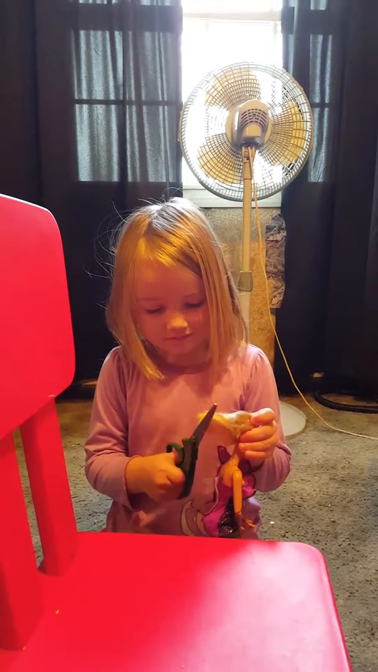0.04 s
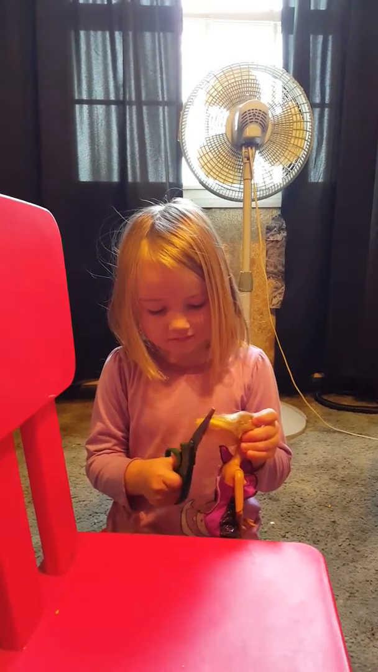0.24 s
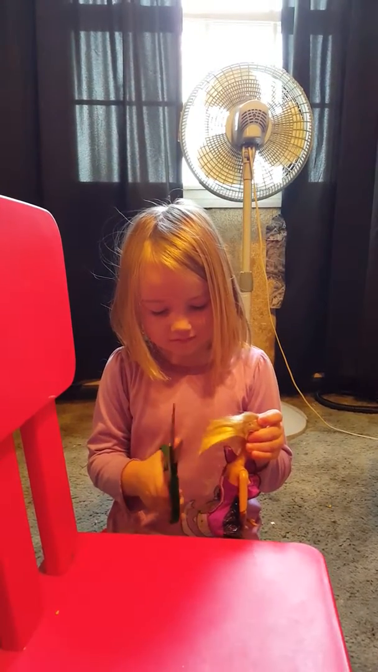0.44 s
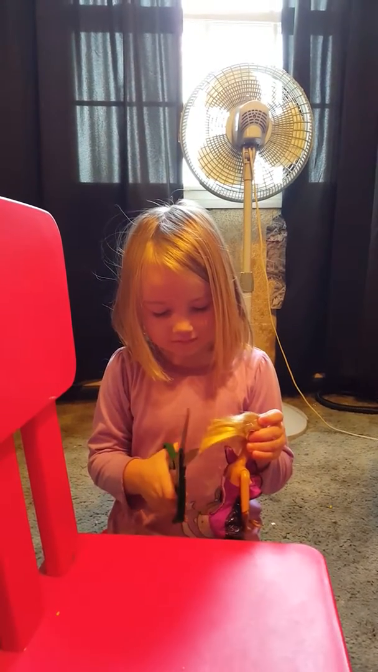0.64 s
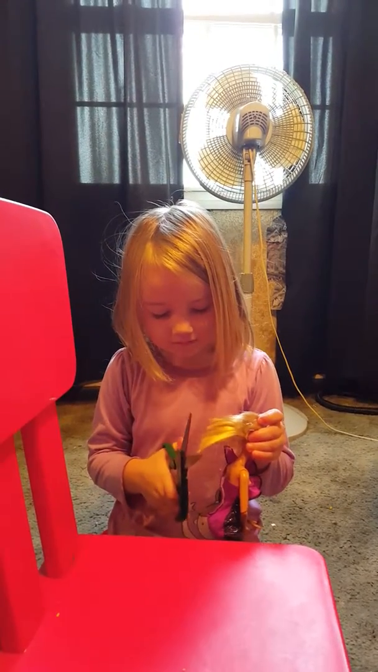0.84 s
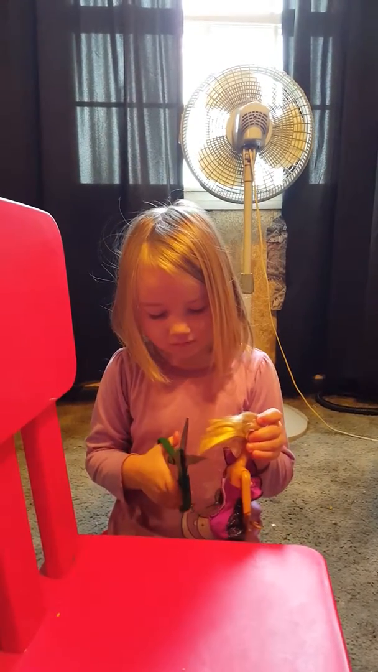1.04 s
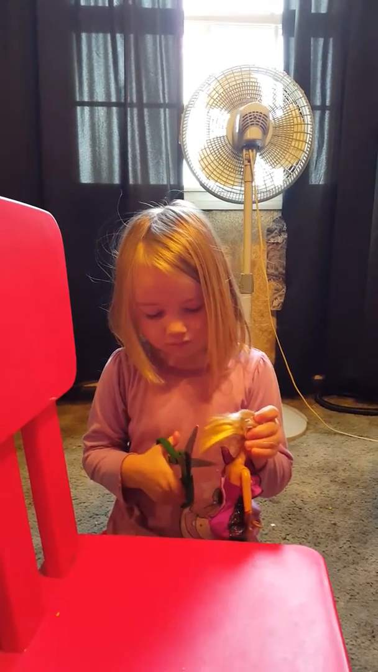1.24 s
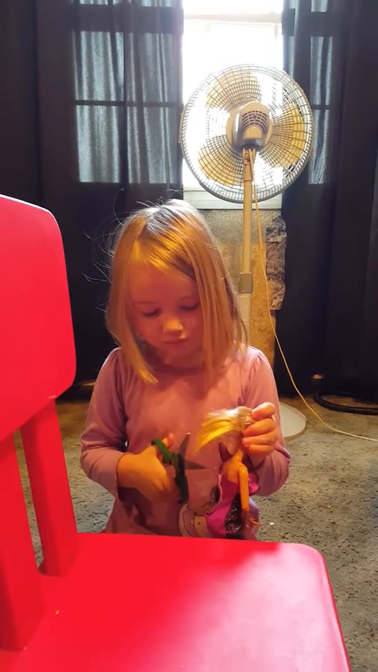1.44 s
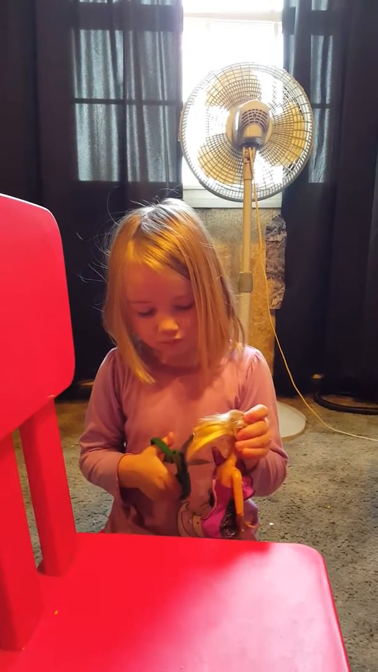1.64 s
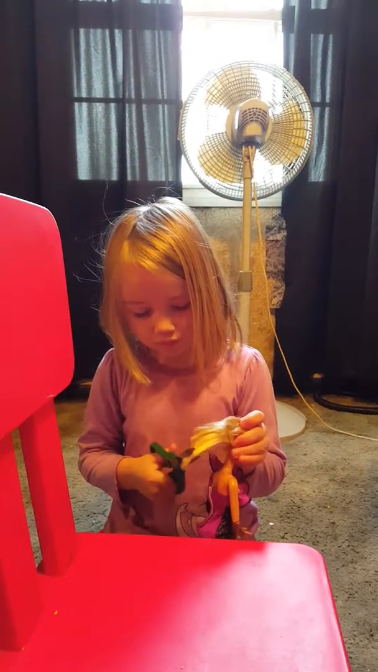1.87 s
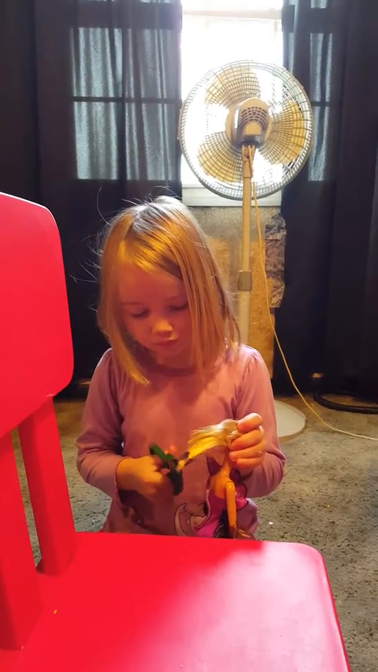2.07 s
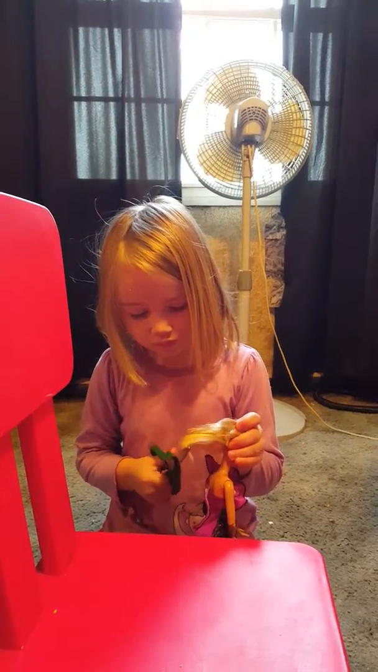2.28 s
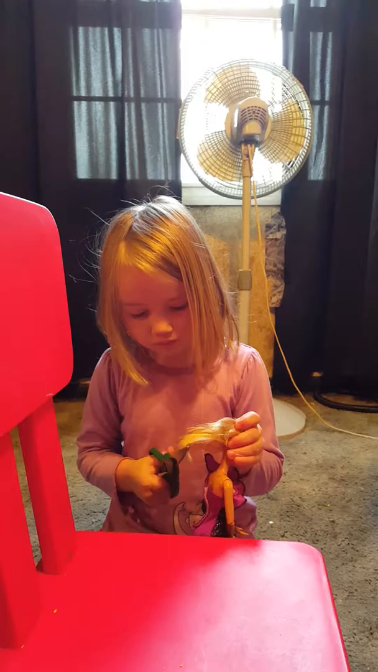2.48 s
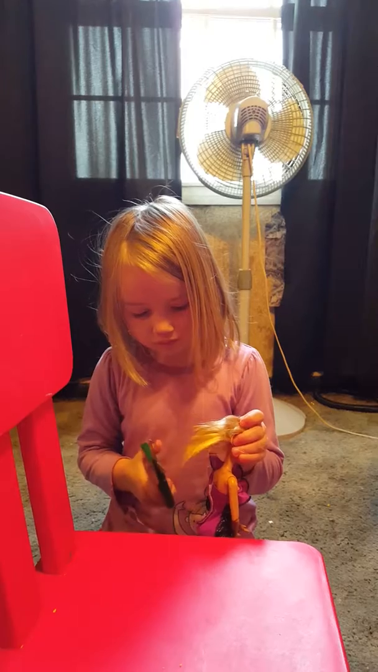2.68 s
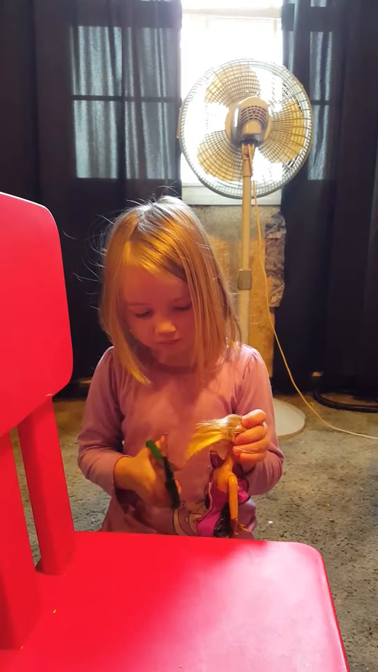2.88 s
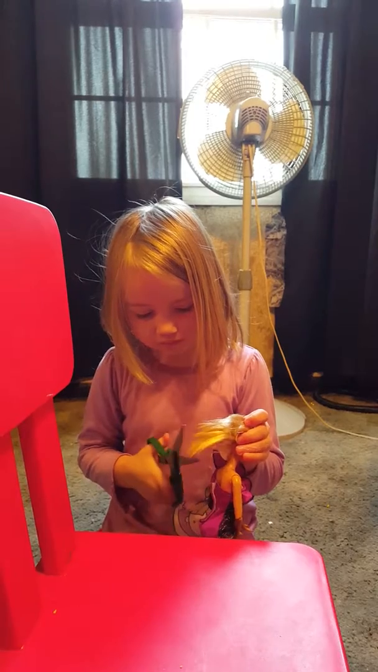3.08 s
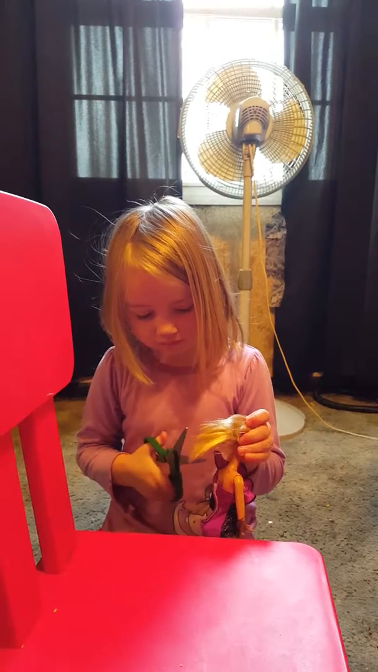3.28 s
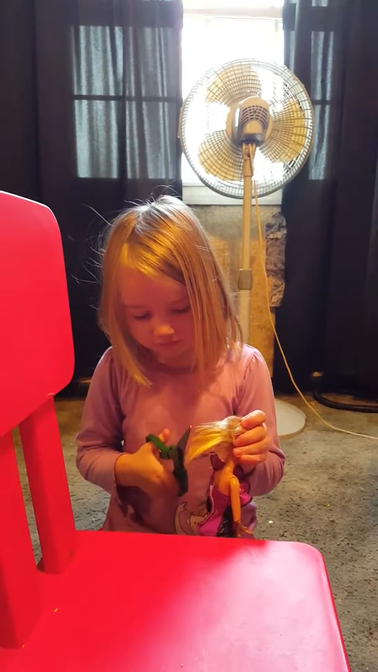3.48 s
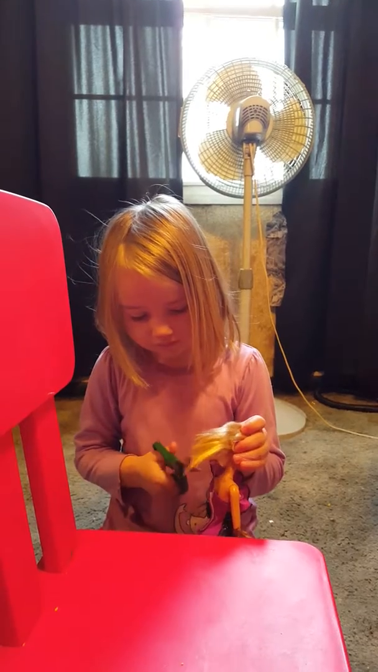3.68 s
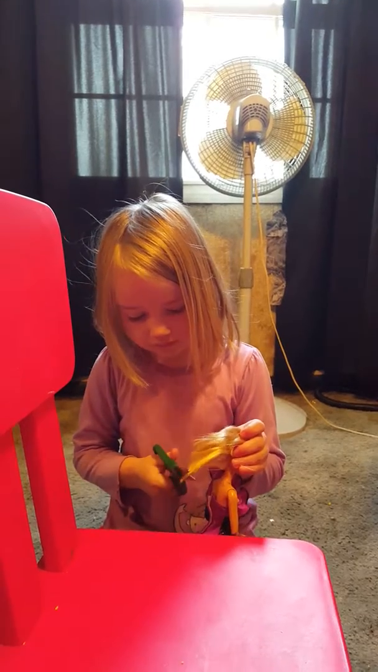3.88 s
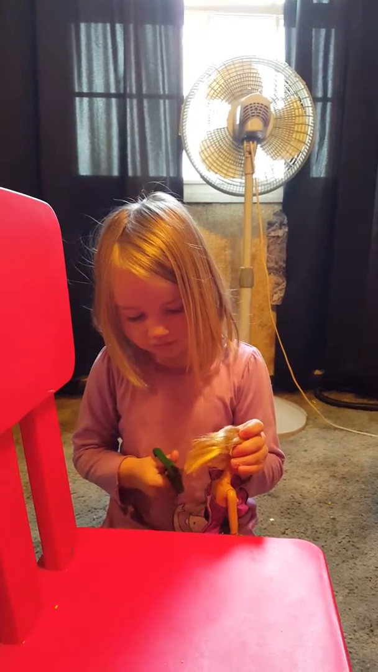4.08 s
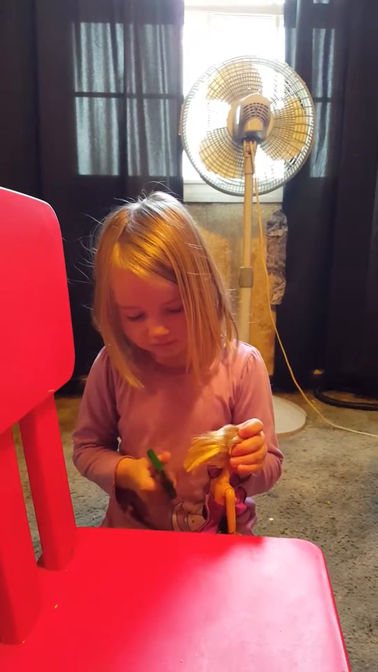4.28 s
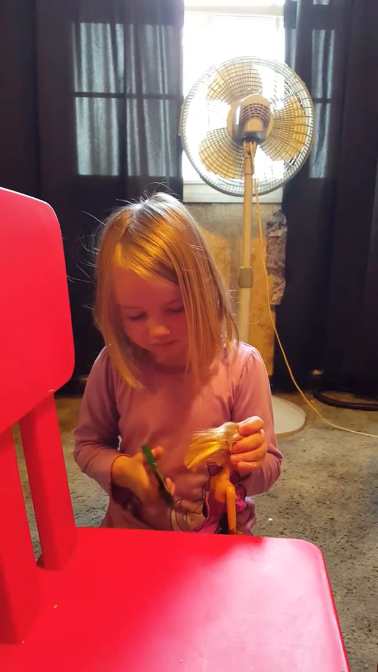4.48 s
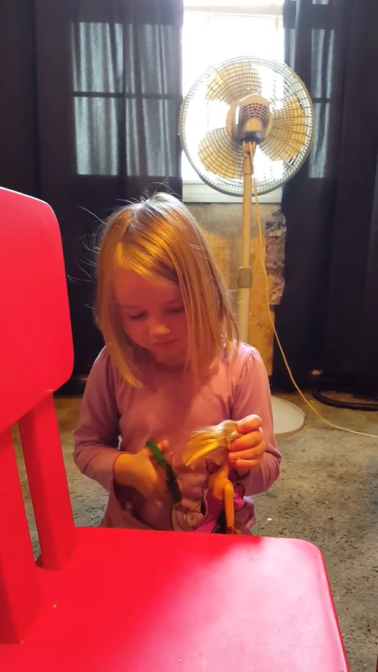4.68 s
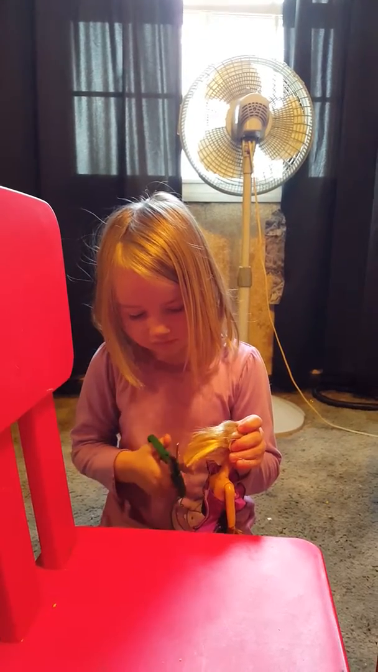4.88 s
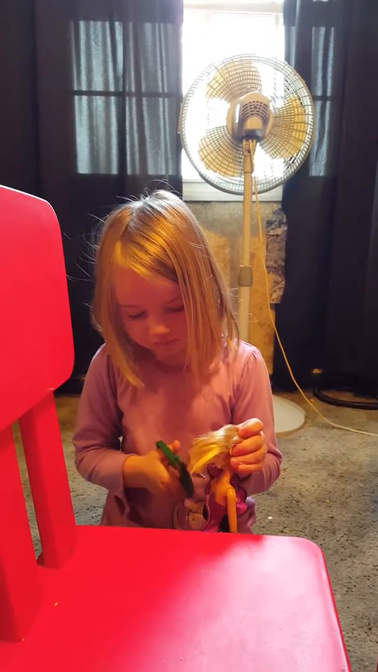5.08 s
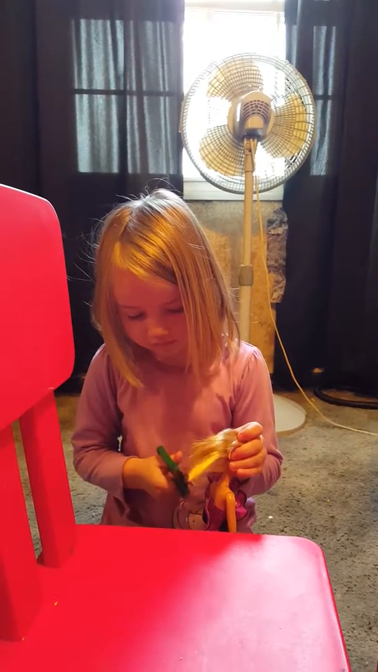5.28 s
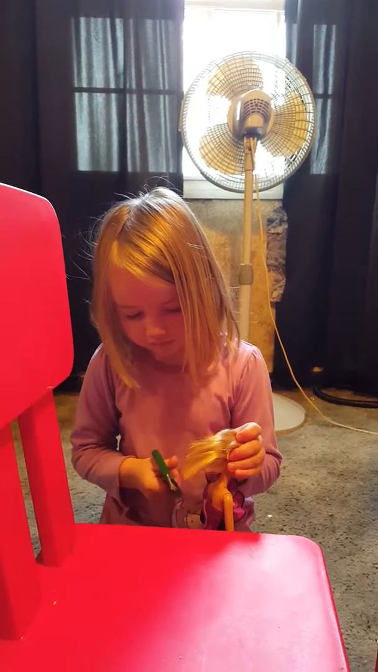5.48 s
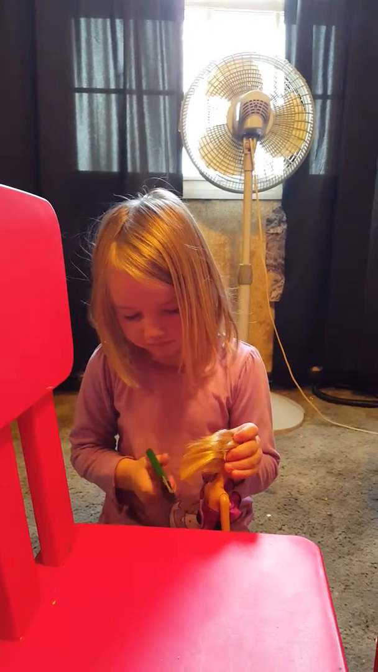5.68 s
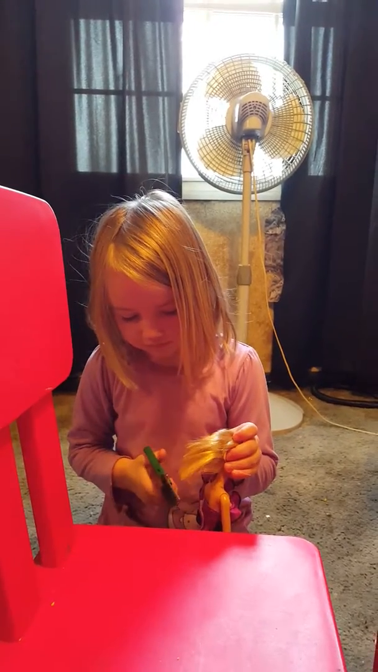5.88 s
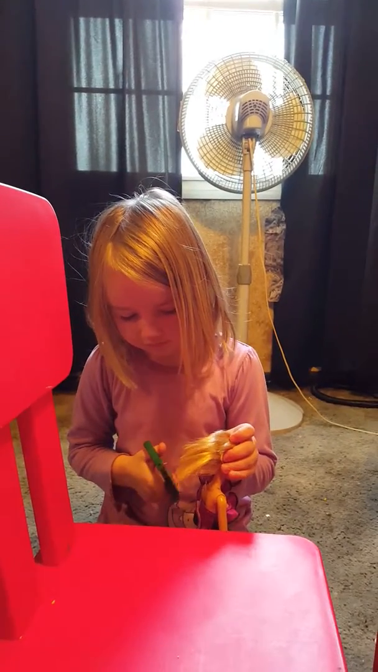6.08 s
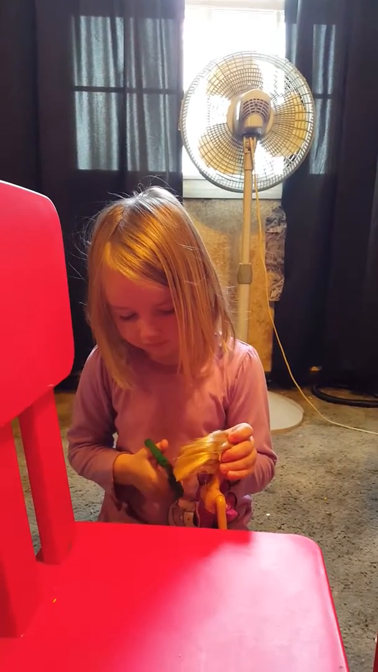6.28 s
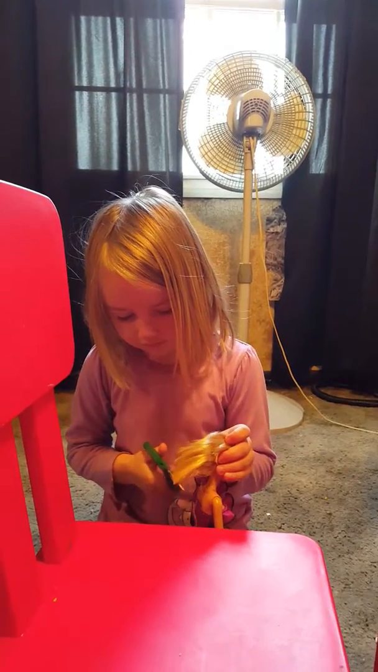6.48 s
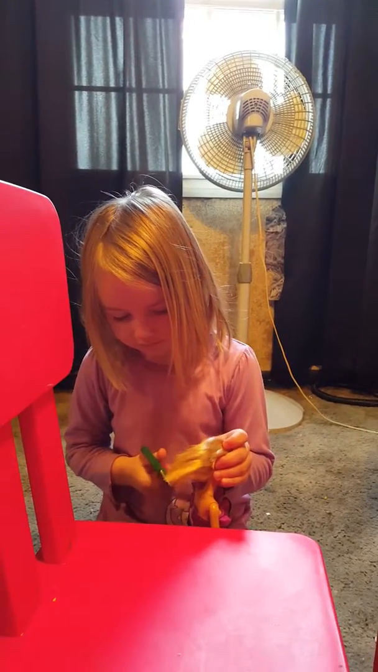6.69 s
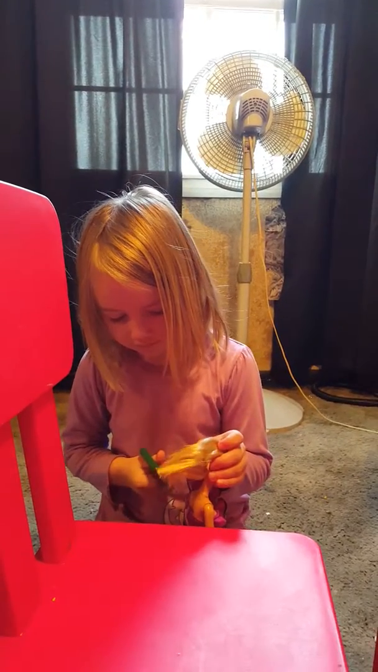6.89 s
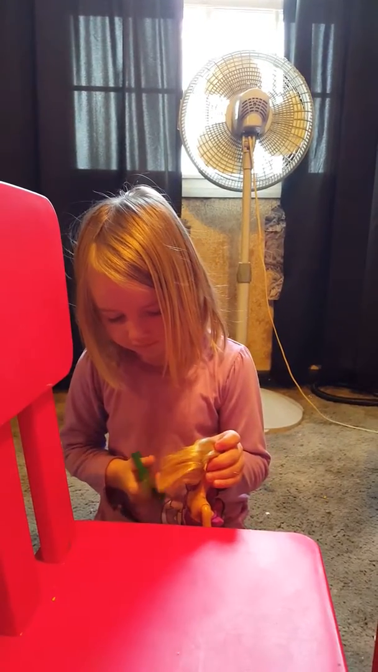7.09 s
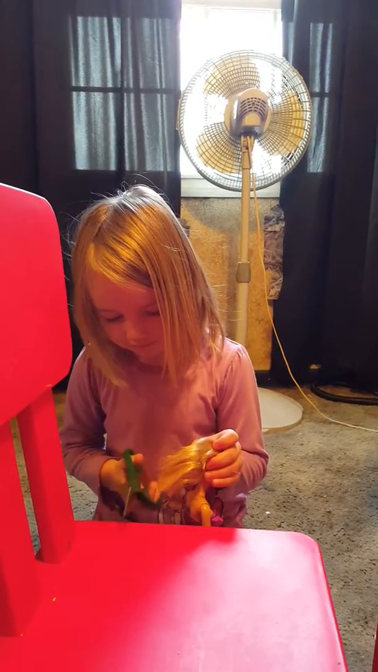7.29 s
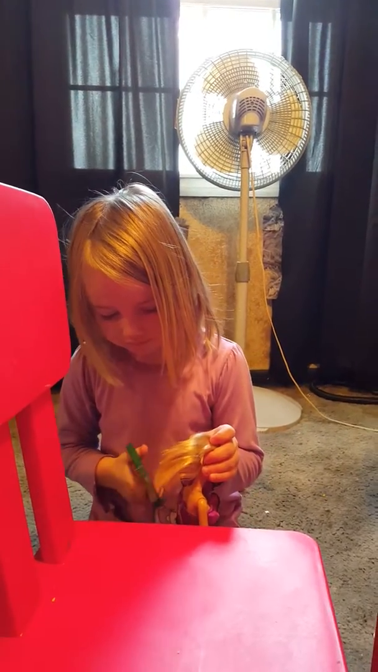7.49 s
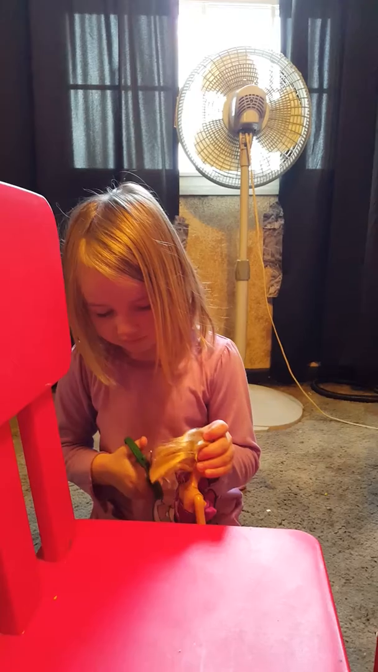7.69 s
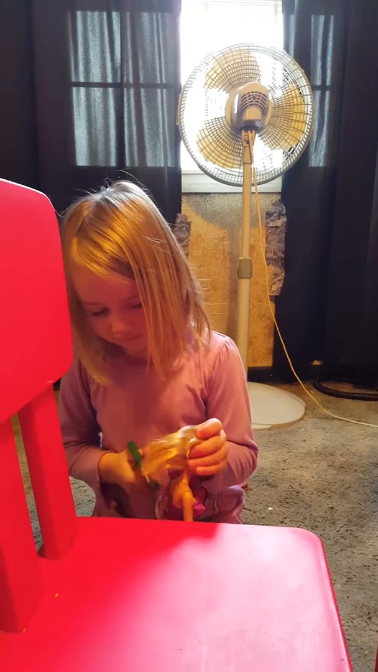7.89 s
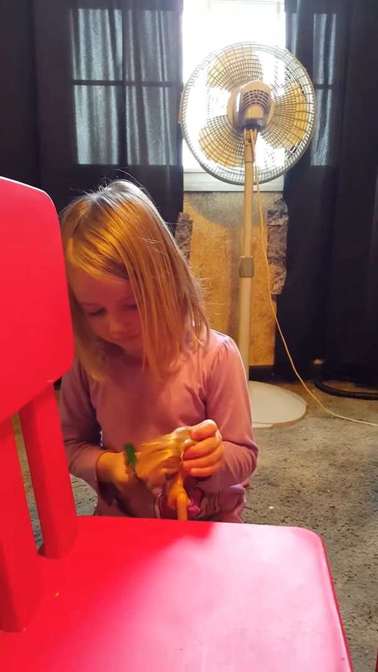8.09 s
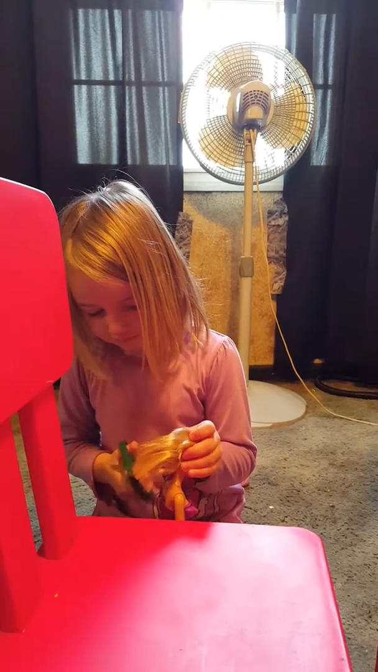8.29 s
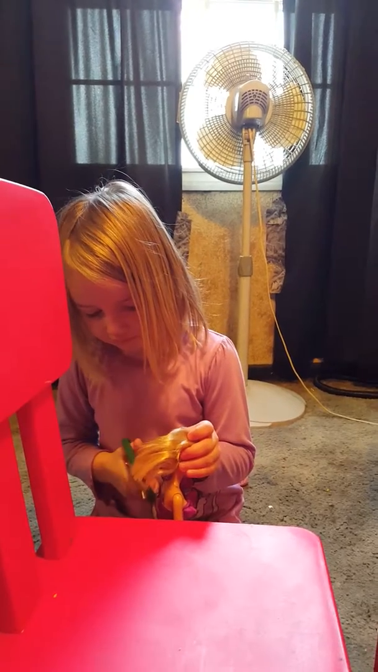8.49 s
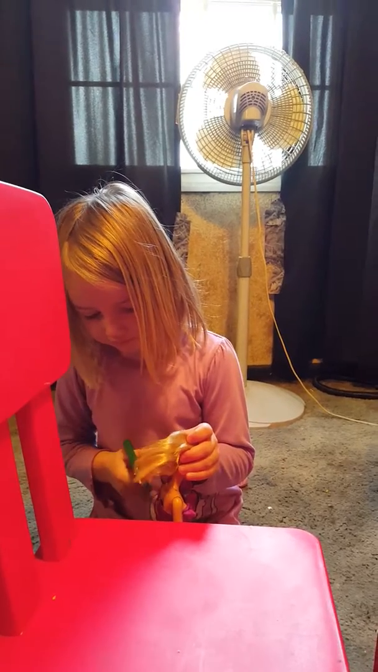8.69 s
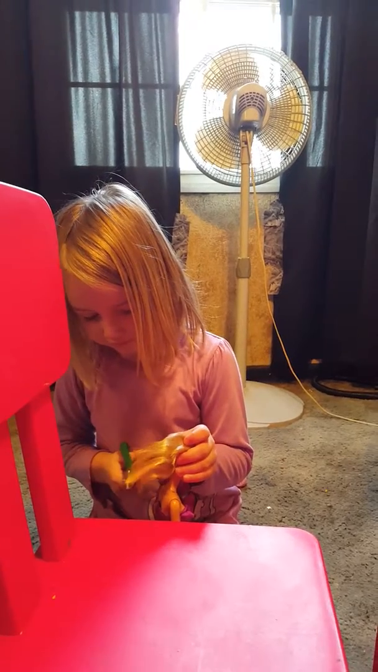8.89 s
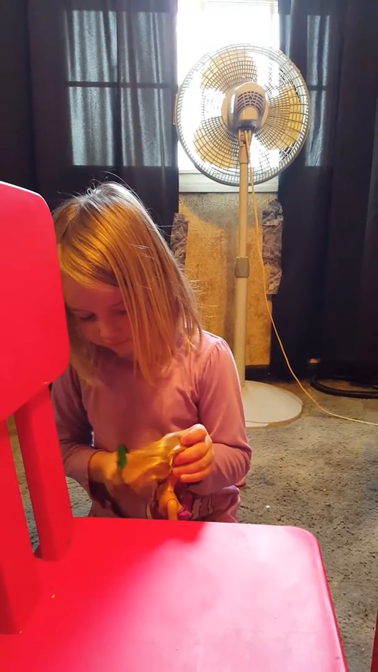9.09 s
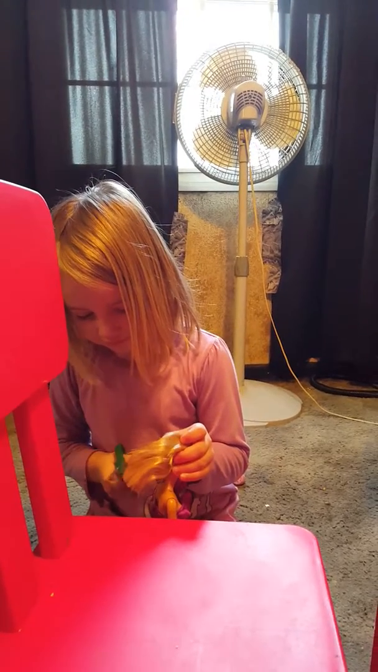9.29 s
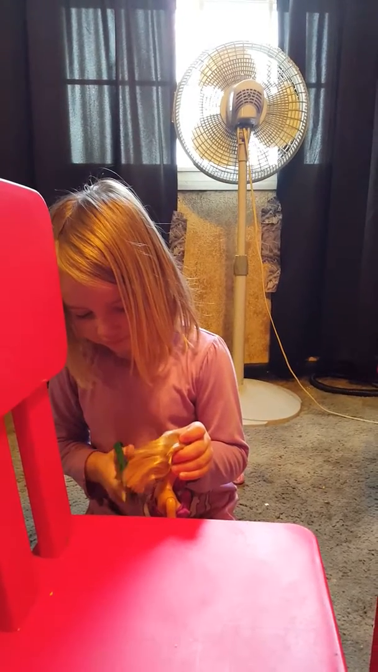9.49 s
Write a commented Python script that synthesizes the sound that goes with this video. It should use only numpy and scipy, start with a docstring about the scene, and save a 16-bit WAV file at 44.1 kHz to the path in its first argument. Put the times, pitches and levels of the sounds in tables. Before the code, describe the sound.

Close to the microphone in a small carpeted room, a child's scissors cut a doll's synthetic hair. Faint ticks and tiny crackles come first, then six unhurried snips, each a bright metallic click with a plastic knock as the handles shut, followed by lighter clicks as the blades reopen. A fan's low, steady hum and soft airflow continue quietly underneath.

```python
"""Small scissors snip a doll's synthetic hair in a carpeted room, close to a phone with two microphones.
From start to end a motor hums steadily at about 120 Hz while a fan stirs the air.
First come faint ticks and short bursts of tiny snaps: strands of hair parting under the edges.
From about 2 s on, cuts often end in a brief slide of the blades and a knock as the handles shut;
lighter clicks follow as the blades reopen. Damped modes ring in each click, and the walls throw it back."""
import sys
import numpy as np
from scipy import signal
from scipy.io import wavfile
from scipy.ndimage import uniform_filter1d

SR = 44100
rng = np.random.default_rng(int(sys.argv[2]) if len(sys.argv) > 2 else 0)


def to_wav(s):
    """Save 16-bit WAV."""
    ch = np.atleast_2d(s).T  # columns
    pcm = np.round(np.clip(ch, -1, 1) * 32767)  # PCM
    wavfile.write(sys.argv[1], SR, pcm.astype(np.int16))


def nominal_scale(level):
    """Amplitude ratio for a level in decibels (scalar or array-like)."""
    x = np.asarray(level, float) / 20
    return 10 ** x


N = 420713
T = np.arange(N) / SR  # time of every sample in s

# The handles knock shut. Knock and pivot are rms, thud is peak, all relative to the steel's peak:
# [t/s, steel peak level/dB, knock level/dB, pivot level/dB, pitch the knock favours f/Hz, hand thud level/dB]
SHUTS = [(2.1473, -10, -16.5, -12, 3490, -17), (3.9805, -7.5, -20, -12.5, 3030, -28),
         (5.379, -5.5, -21.5, -15.5, 4546, -26.5), (6.759, -31, -1.5, -9.5, 4300, -10.5),
         (7.9683, -26.5, -5, -14, 3780, -19), (9.0803, -20, -8.5, -11.5, 3630, -11.5)]
# The blades come apart again and catch at the pivot, levels as above:
# [t/s, steel peak level/dB, knock level/dB, pivot level/dB, pitch the knock favours f/Hz]
OPENINGS = [(2.5613, -20.5, -16.5, -16, 3520), (4.3274, -42.5, -10, -6.5, 3070),
            (4.356, -26, -20.5, -17.5, 3010), (5.682, -39, -21, -14, 3000), (5.7116, -28, -23.5, -16, 3160),
            (7.0961, -46, -19, -25, 3100), (7.1206, -31, -24, -12.5, 3160),
            (7.1688, -30.5, -19, -11.5, 3250), (8.2568, -41.5, -18.5, -9, 2960),
            (8.294, -34, -13.5, -13, 3130), (9.4503, -33, -15, -12.5, 2980),
            (9.4772, -30, -18.5, -14, 3500)]
# Small ticks as the edges catch on hair or on each other, levels as above:
# [t/s, steel peak level/dB, knock level/dB]
TICKS = [(0.38, -48.5, -21), (0.7704, -54, -9), (1.2951, -67.5, 5), (1.3463, -59, -7),
         (1.7776, -55.5, -6.5), (1.8326, -56.5, 2.5), (1.929, -57.5, -25), (1.9884, -46.5, -22),
         (2.0787, -51.5, -19.5), (2.1006, -39, -24), (2.6436, -45, -28), (2.656, -49, -23),
         (2.7183, -52.5, -17), (3.6202, -54, -21), (3.7144, -53.5, -16), (3.7681, -52.5, -18),
         (3.8028, -50, -27), (3.8426, -42.5, -26), (3.8786, -49.5, -25), (3.9041, -52, -17.5),
         (5.1911, -52, -19.5), (5.243, -41.5, -26), (5.2874, -37.5, -21), (5.3367, -31.5, -23),
         (6.5478, -53.5, -15), (6.6025, -48.5, -23), (6.6371, -49, -15), (6.7127, -41.5, -17),
         (7.894, -51, -8), (7.9264, -43.5, -19), (7.9488, -44.5, -13), (7.9627, -34, -19),
         (8.623, -48, -12.5), (8.6681, -38.5, -18), (8.735, -56.5, -20), (8.804, -39.5, -17),
         (8.8214, -44.5, -10)]
# Edge sliding on edge: [start t/s, end t/s, rms level halfway level/dB]
SLIDES = [(2.137, 2.148, -39), (3.966, 3.981, -36), (5.356, 5.379, -42), (6.748, 6.76, -46),
          (7.963, 7.969, -41), (9.072, 9.082, -39), (9.44, 9.451, -51)]
# Strands parting under the edges: [start t/s, length t/s, rms level at the start level/dB, change by the end level/dB]
CUTS = [(.36, .05, -75, 7.5), (1.822, 0.031, -53.5, -25.5), (2.095, 0.059, -58.5, -4),
        (3.705, .22, -80, 10), (4.323, 0.026, -52, -5.5), (5.243, .09, -52, -8.5),
        (5.329, 0.0096, -59.5, 14), (5.676, 0.014, -58.5, 5), (6.54, 0.18, -71.5, -5),
        (6.709, .03, -52, -34), (7.091, .017, -53.5, -30), (7.883, .06, -64, 2), (8.251, 0.022, -48, -11.5),
        (8.275, 0.022, -62, 17.5), (8.625, 0.038, -60, -10), (8.665, 0.037, -50.5, -25),
        (8.73, .022, -74.5, 17), (8.8, 0.032, -51.5, -12)]
# Ringing modes of the steel: [f/Hz, width f/Hz, relative level/dB]
STEEL = [(9635, 700, -3.5), (11320, 510, -1), (12540, 1200, -2), (14000, 1200, -3.5), (15400, 900, -10.5)]
# Ringing modes of the plastic handles: [f/Hz, width f/Hz, relative level/dB]
HANDLES = [(1970, 160, -1), (2343, 210, 4.5), (2900, 110, 3), (3390, 720, 6), (3690, 130, -2.5),
           (4150, 250, -2), (4458, 290, 7)]
# Ringing modes of the screw joint: [f/Hz, width f/Hz, relative level/dB]
PIVOT = [(5370, 620, -2), (5430, 130, -6), (6120, 500, -3.5), (7680, 720, -2.5), (8980, 270, -11.5)]
# Thud of fingers and doll: [f/Hz, width f/Hz, relative level/dB]
HAND = [(220, 200, -6.5), (700, 250, -3.5), (900, 220, -1)]
# Where the scissors are: [t/s, left over right level/dB]
SIDEWAYS = [(0, -14.5), (2.2, -2), (4, -3), (5.4, -1), (6.8, -5.5), (8, -2.8), (9.5, -5)]
# How long the room rings: [f/Hz, time to fall by 60 dB t/s]
ROOM = [(500, .2), (2600, .21), (7000, .19), (11000, .17), (15000, .13)]
# First wall echoes: [delay t/ms, energy level/dB]
WALLS = [(7.4, -16), (10, -14), (14.5, -13)]
# Strength of the steady hum: [t/s, rms of its strongest tone level/dB]
MAINS = [(0.0, -61.5), (0.55, -60), (3.08, -58.5), (4.33, -57.5), (4.8, -59.5), (5.4, -57), (9.54, -58)]
# Tones in the steady hum: [f/Hz, level relative to the strongest level/dB]
HUM = [(120.02, 0), (240.04, -4), (221.3, -12), (840.15, -20), (12355, -41)]
# Fan speed: [t/s, turns a second f/Hz]
SHAFT = [(0, 22.92), (3, 22.87), (7.2, 22.71), (9.54, 22.8)]
# Fan tones: {multiple of the turning speed: middle rms level/dB}
ORDERS_DB = {5: -67, 7: -75, 9: -76, 12: -72, 27: -74, 28: -77, 29: -76, 30: -78, 32: -77, 37: -78}
# Colour of the fan wash and hiss: [f/Hz, relative level per Hz level/dB]
AIR = [(330, -2.5), (400, -2.5), (520, -3.5), (630, -3), (850, -1.5), (905, -8), (1000, -4), (1260, -12.5),
       (2020, -15.5), (3500, -24), (6000, -30.5), (9500, -35.5), (12300, -32.5), (16300, -33)]
# Colour of the same air up to 300 Hz: [f/Hz, relative level per Hz level/dB]
RUMBLE = [(20, -38.5), (40, -15.5), (70, 2), (150, -1), (250, 1), (300, -1)]
# How alike the air is at left and right: [f/Hz, likeness from -1 to 1]
SAME = [(60, 0.38), (180, 0.89), (550, 0.6), (1650, -0.027), (4970, -0.15), (15000, 0.24)]


def ring(modes):
    """Struck objects ring: fading sines, where a wider mode fades sooner; total energy 1."""
    t = np.arange(1024) / SR
    h = np.zeros(1024)
    for k, (hz, width, db) in enumerate(modes):
        fade = np.exp(-np.pi * width * t)
        h += (-1) ** k * nominal_scale(db) * np.sqrt(width) * fade * np.sin(2 * np.pi * hz * t)
    return h / np.linalg.norm(h)


def evened(x):
    """Scales a sound to an average strength (rms) of 1."""
    return x / np.sqrt(np.mean(x ** 2) + 1e-20)


def clicks():
    """A short rattle of impacts rings steel and pivot; one blow in its midst knocks handles and hand."""
    rattle_ms, unshared = 3.4, 1  # time scale; strength of each microphone's own part
    tick_knock_hz, tick_pivot_db, light_thud_db = 3298, -19.5, -24.5
    # Loss in dB an octave from the favoured pitch: a light touch rings few handle modes, a hard knock many
    narrow_db, wide_db = 26.5, 6.5
    rows = [(*row, wide_db) for row in SHUTS]
    rows += [(*row, light_thud_db, narrow_db) for row in OPENINGS]
    rows += [(*row, tick_pivot_db, tick_knock_hz, light_thud_db, narrow_db) for row in TICKS]

    out = np.zeros((2, N + 2048))
    steel, pivot, hand = ring(STEEL), ring(PIVOT), ring(HAND)
    u = np.arange(1024) / (SR * rattle_ms / 1000)
    swell_and_fade = np.sqrt(u) * np.exp(-2.2 * u ** 2)
    impact = signal.unit_impulse(1024, round(0.001184 * SR))  # 1.184 ms into the rattle
    for s, db, knock_db, pivot_db, knock_hz, thud_db, loss_db in rows:
        draw = rng.standard_normal((3, 1024))
        rattle = (draw[0] + unshared * draw[1:]) * swell_and_fade
        blow = 0.14 * rattle + impact
        handles = ring([(hz, width, level - loss_db * abs(np.log2(hz / knock_hz)))
                        for hz, width, level in HANDLES])
        steel_ring = signal.fftconvolve(rattle, steel[None])
        knock = signal.fftconvolve(blow, handles[None])
        pivot_ring = signal.fftconvolve(rattle, pivot[None])
        thud = signal.fftconvolve(blow, hand[None])

        # Steel and thud are set by peak, knock and pivot by the rms of their loudest 4 ms
        sound = steel_ring / abs(steel_ring).max()
        sound = sound + nominal_scale(thud_db) * thud / abs(thud).max()
        for part, part_db in ((knock, knock_db), (pivot_ring, pivot_db)):
            rms = np.sqrt(uniform_filter1d((part ** 2).mean(0), size=180).max())
            sound = sound + nominal_scale(part_db) * part / rms
        at = round(s * SR)
        out[:, at:at + 2047] += nominal_scale(db) * sound
    return out[:, :N]


def rubbing():
    """Dense small snaps of uneven size ring the scissors during slides and cutting strokes."""
    level = np.zeros(N)
    for start, length, db, change_db in CUTS:
        u = (T - start) / length
        level += nominal_scale(db + change_db * u.clip(0, 1)) * (u > 0) * (u < 1)
    for start, end, db in SLIDES:
        u = (T - start) / (end - start)
        level += nominal_scale(db + 6 * (u.clip(0, 1) - .5)) * (u > 0) * (u < 1)  # swells by 6 dB
    happens = rng.random(N) < 8000 / SR  # about 8000 snaps a second
    size_db = 3 * rng.exponential(1, N).clip(0, 4)
    clump_db = 3.5 * evened(uniform_filter1d(rng.standard_normal(N), 150))
    snaps = happens * nominal_scale(size_db + clump_db)
    body = ring(STEEL) + nominal_scale(-3) * ring(HANDLES) + nominal_scale(-5) * ring(PIVOT)
    body = body / np.linalg.norm(body)
    return signal.oaconvolve(evened(snaps) * uniform_filter1d(level, 60), body)[:N]


def placed(x):
    """The left microphone is a little farther and shaded in the treble; the balance moves with time."""
    pan_db = np.interp(T, *np.transpose(SIDEWAYS))
    later = np.roll(x[0], 3)  # 3 samples
    left = signal.lfilter([1, .25], [1.1], later)
    return np.array([left * nominal_scale(pan_db / 2), x[1] * nominal_scale(-pan_db / 2)])


def read(points, hz):
    """Reads a curve between its points on a log-frequency axis."""
    f, value = np.transpose(points)
    return np.interp(np.log(hz + 1), np.log(f + 1), value)


def room(x):
    """A few wall echoes, and sparse taps whose bands die at their own speeds; three tails share the work."""
    room_db, start_ms = -8.5, 3.6  # energy of the taps, and their first delay
    out, size = np.zeros((2, N)), SR // 2
    for k in range(3):
        taps = np.zeros((2, size))
        at = np.arange(round(start_ms * SR / 1000), size - 20, 20)
        at = at + rng.integers(0, 20, (2, len(at)))
        np.put_along_axis(taps, at, rng.choice([-1., 1.], at.shape), 1)
        hz, t, z = signal.stft(taps, SR, nperseg=128)
        fade = nominal_scale(-60 * t / read(ROOM, hz)[:, None])
        tail = signal.istft(z * fade, SR, nperseg=128)[1]
        tail *= nominal_scale(room_db) / np.linalg.norm(tail[0])
        for ms, db in WALLS:  # rough walls smear each echo over a millisecond or two
            at = round(ms * SR / 1000)
            smear = rng.standard_normal((2, 80)) * np.hanning(80) / 5.5  # energy about 1
            tail[:, at:at + 80] += nominal_scale(db) * smear
        # The tails take turns, 1.2 rounds a second, with the same total power
        share = np.sqrt(2 / 3) * np.cos(2 * np.pi * (1.2 * T + k / 3))
        out += signal.fftconvolve((x * share)[None], tail, axes=1)[:, :N]
    return out


def drift(top_hz):
    """Slow random wandering of rms 1, made of ten sines up to top_hz."""
    t = T[::256]
    waves = [np.sin(2 * np.pi * (f * t + rng.random())) / np.sqrt(f)
             for f in np.geomspace(top_hz / 10, top_hz, 10)]
    return np.interp(T, t, evened(sum(waves)))


def motor():
    """Hum tones of steady pitch, and fan tones whose pitch follows its turning and whose level wanders."""
    hum = sum(nominal_scale(db) * np.sin(2 * np.pi * (hz * T + rng.random())) for hz, db in HUM)
    hum = hum * nominal_scale(np.interp(T, *np.transpose(MAINS)))
    turns = np.cumsum(np.interp(T, *np.transpose(SHAFT))) / SR
    fan = np.zeros(N)
    for multiple, db in ORDERS_DB.items():
        tone = np.sin(2 * np.pi * (multiple * turns + rng.random()))
        fan += nominal_scale(db + 1.3 * drift(3.2)) * tone
    return np.sqrt(2) * (hum + fan)  # a sine of rms 1 peaks at root 2


def air():
    """Fan wash and microphone hiss: random spectra with soft patches, most alike left and right near 180 Hz."""
    frames, hz = N // 512 + 5, np.fft.rfftfreq(2048, 1 / SR)
    a, b, c, d, patches = rng.standard_normal((frames, 1025, 5)).T
    patches = uniform_filter1d(patches, 20, 0)  # across frequency
    patches = evened(uniform_filter1d(patches, 6, 1))  # across time
    same = np.clip(read(SAME, hz), -1, 1)[:, None]
    left = a + 1j * b
    right = same * left + np.sqrt(1 - same ** 2) * (c + 1j * d)
    colour_db = read(list(RUMBLE) + list(AIR), hz)[:, None]
    z = np.array([left, right]) * nominal_scale(colour_db + 1.3 * patches)
    wash = signal.istft(z, nperseg=2048, noverlap=1536)[1][:, :N]
    return nominal_scale(-57.5) * evened(wash)  # dB rms


def scene():
    """Scissors with their room, over fan and motor."""
    scissors = clicks() + rubbing()
    return placed(scissors) + room(scissors[1]) + air() + motor()


def band_limit(x):
    """A steep low-pass at the top of the band."""
    return signal.sosfilt(signal.butter(12, 16970, fs=SR, output="sos"), x)


def record(dry):
    """The microphone drops the deepest bass, below about 45 Hz."""
    bass_cut = signal.butter(2, 45, "high", fs=SR, output="sos")
    mix = signal.sosfilt(bass_cut, dry)
    return band_limit(mix)


dry = scene()
out = record(dry)
to_wav(out)
```